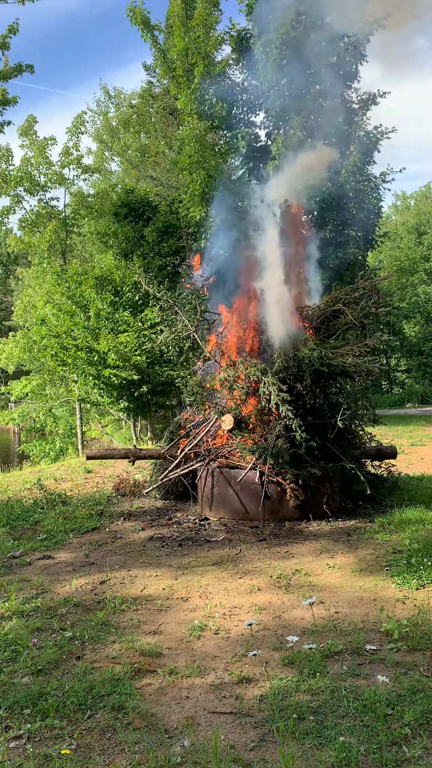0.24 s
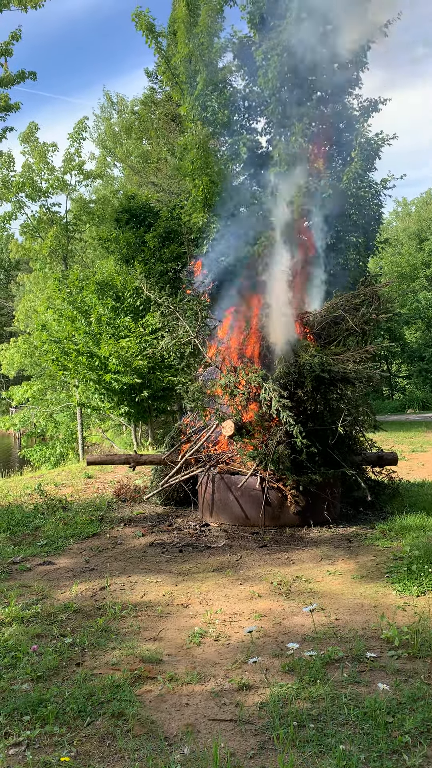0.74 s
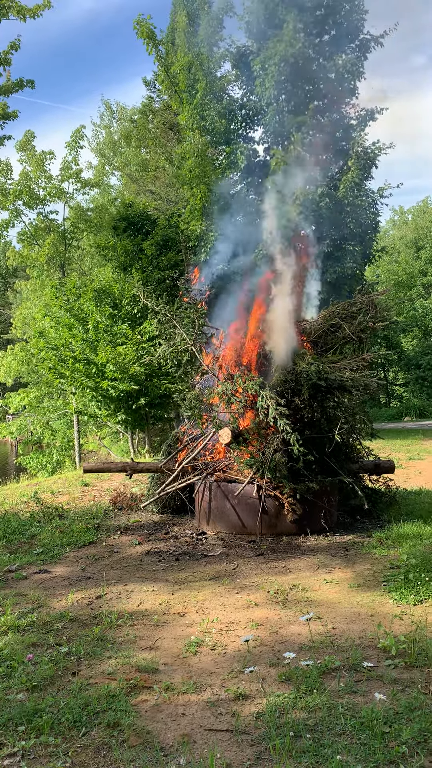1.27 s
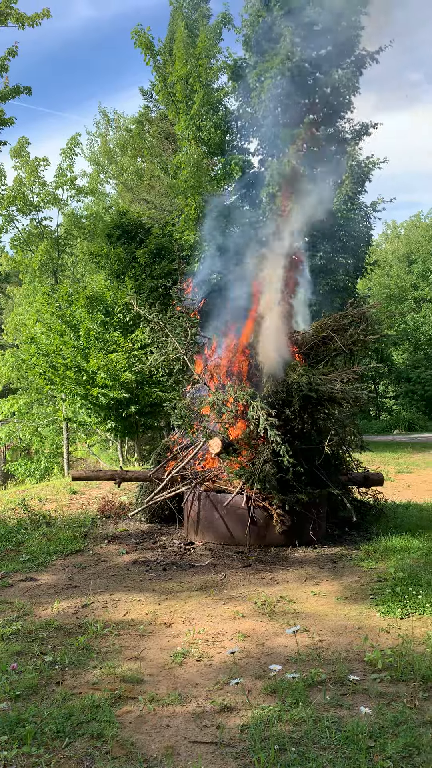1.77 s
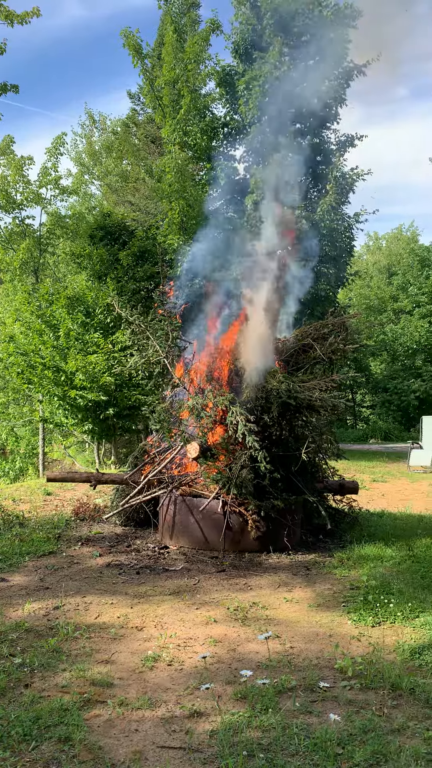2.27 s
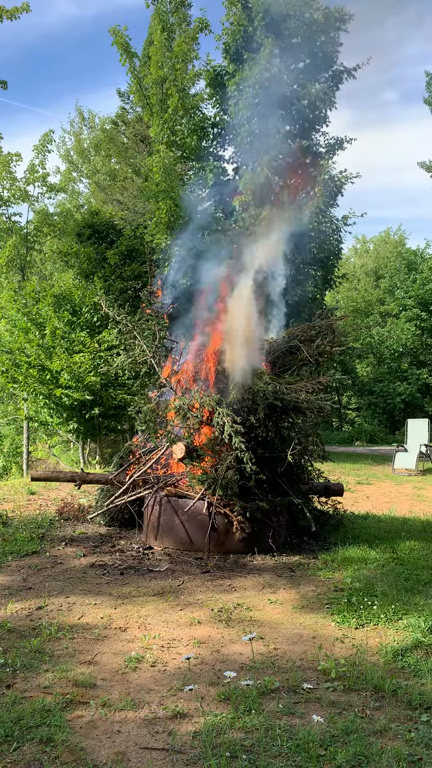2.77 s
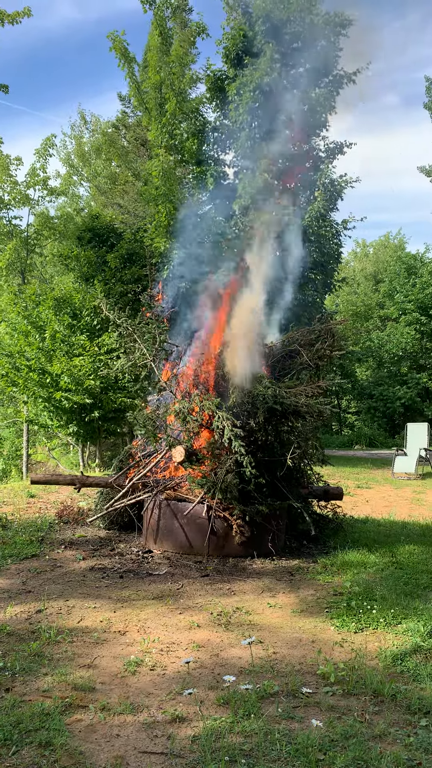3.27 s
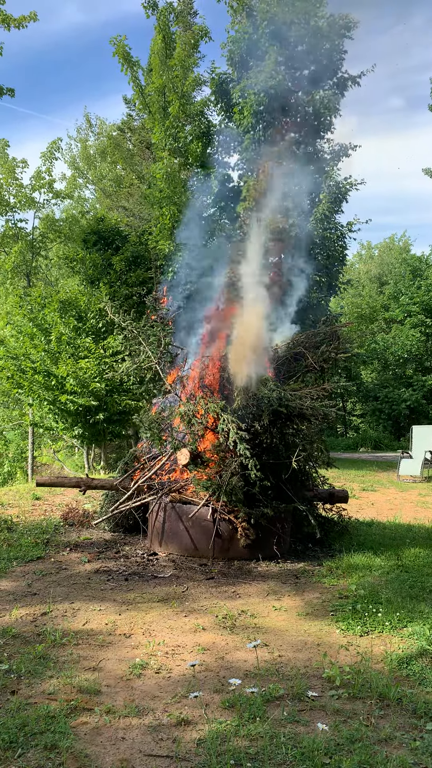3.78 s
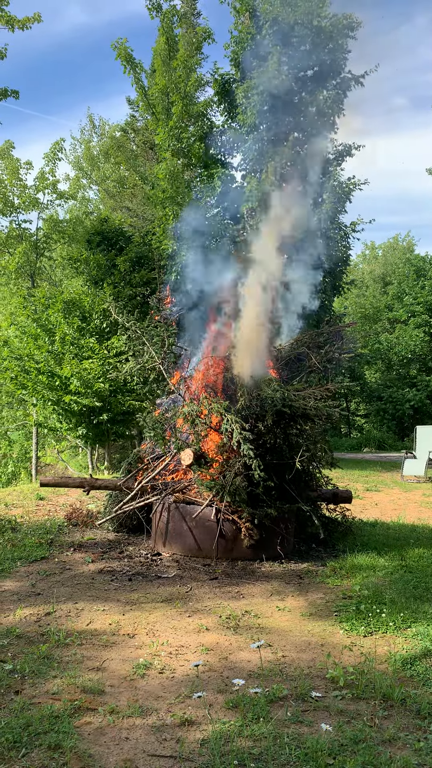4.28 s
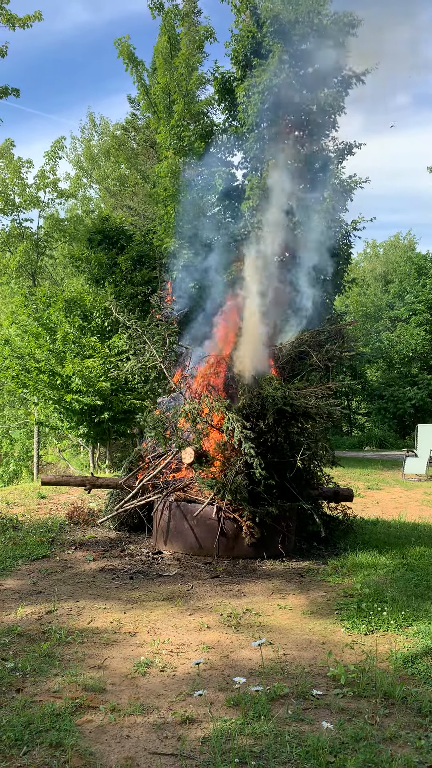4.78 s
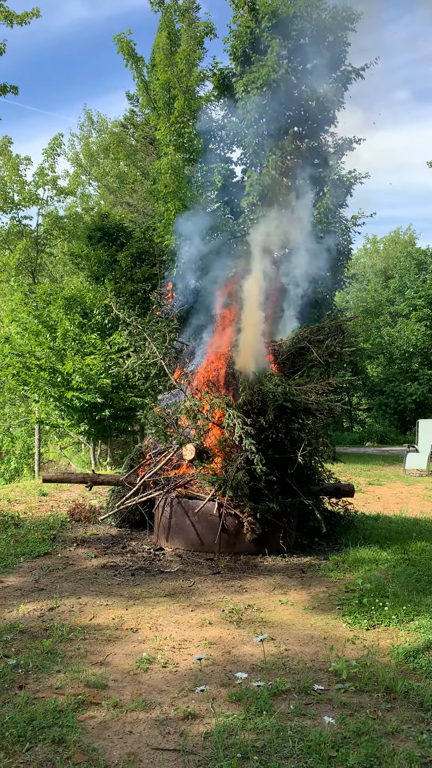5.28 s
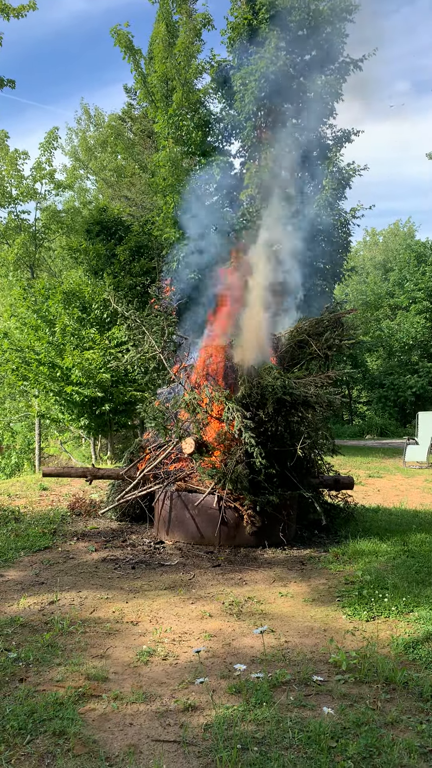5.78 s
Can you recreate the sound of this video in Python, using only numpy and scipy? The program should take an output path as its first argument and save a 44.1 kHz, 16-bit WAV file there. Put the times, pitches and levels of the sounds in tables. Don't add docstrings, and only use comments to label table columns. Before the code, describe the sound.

A large heap of green brush burns outdoors, heard from some ten metres away. A low, steady flame roar and soft rush stay faint underneath. Fine needle crackle runs throughout, with bright, dry twig snaps standing out, strongest in clusters between about one and four seconds. Thicker sticks give short hollow pops. A stereo microphone catches it in open air, with only a dull, immediate reflection from soft ground.

```python
import sys
import numpy as np
from scipy import signal
from scipy.fft import rfft, irfft, next_fast_len
from scipy.io import wavfile
from scipy.ndimage import uniform_filter1d, minimum_filter1d

SR = 44100
rng = np.random.default_rng(int(sys.argv[2]) if len(sys.argv) > 2 else 0)


def amplitude_ratio(level_db):
    exponent = np.asarray(level_db, float) / 20
    return 10 ** exponent


def materialize(psi):
    bounded = np.clip(np.atleast_2d(psi).T, -1, 1)
    quanta = np.round(bounded * 32767).astype(np.int16)
    wavfile.write(sys.argv[1], SR, quanta)


N = 265878

# time in seconds, level of the rush in dB.
FLAME_RUSH = [
    (0.0, -47),
    (3.81, -47.5),
    (4.16, -46),
    (5.04, -48),
    (6.03, -46),
]
# frequency in Hz, level in dB per Hz.
ROAR_TONE = [(20, -40), (32, -9), (55, -4), (85, -2), (160, -6.5), (250, -13.5), (330, -15), (500, -29.5),
             (800, -94)]
# frequency in Hz, level in dB per Hz.
RUSH_TONE = [(120, -58), (250, 12), (400, 9.5), (700, 6), (1400, 1.5), (2800, -7.5), (5000, -34),
             (10000, -4.5), (16000, -13.5)]
# time in seconds, level in dB.
CRACKLE = [(0.0, -36.5), (0.23, -40), (0.77, -41.5), (0.95, -38), (1.53, -40), (1.61, -40), (2.13, -37),
           (2.79, -38), (3.09, -38.5), (3.96, -39.5), (4.1, -38), (4.68, -38.5), (5.07, -40), (5.64, -38.5),
           (6.03, -37.5)]
# frequency in Hz, level in dB per Hz.
SNAP_TONE = [(250, -70), (600, -26), (1000, -16), (2000, -11), (4000, -7), (5000, -4), (7600, -3),
             (8300, 0), (10500, -2), (16500, -1)]
# time in seconds, peak
# level in dB.
MORE_TWIG_CRACKS = [(0.0845, -20), (0.2432, -13.5), (0.837, -7.5), (1.4267, -6), (1.6105, -9), (1.7108, -12),
                    (1.897, -19), (1.9969, -9), (2.1358, -14.5), (2.1739, -7.5), (2.2499, -4.5), (2.5705, -11),
                    (2.822, -10), (3.2795, -7), (3.6786, -12), (3.6842, -8), (3.7495, -10.5), (3.9057, -8.5),
                    (4.2967, -9.5), (4.3353, -10), (4.2377, -10), (4.5901, -11), (4.6244, -15.5), (4.6772, -11),
                    (4.8244, -11.5), (5.0393, -9), (5.1301, -9.5), (5.1533, -10), (5.824, -6), (5.9, -14)]
# time in seconds, peak level in dB, woody body in dB
TWIG_CRACKS = [(0.4627, -9, -19.5), (0.4716, -7, -19.5), (0.6929, -12, -25), (0.8304, -3, -27),
               (0.8517, -10, -22), (0.8619, -8.5, -15), (0.9739, -12, -12), (1.1002, -11, -15.5),
               (1.173, 0, -32), (1.1907, -13, -11), (1.3673, -2, -23), (1.5583, -7, -21),
               (1.5927, -7, -24.5), (1.6983, -7.5, -24), (2.0221, -6, -18), (2.2183, -6.5, -20.5),
               (2.3001, -2.5, -31), (2.3885, -12, -32), (2.7439, -9.5, -19), (2.9653, -3, -14.5),
               (2.9689, -6, -60), (3.6828, -7.5, -15), (3.7108, -9.5, -8), (3.9448, -6.5, -27),
               (3.9832, -4.5, -17), (4.0355, -7, -17), (5.4788, -9, -13.5), (5.5078, -4.5, -19.5),
               (5.5207, -9, -33), (5.7101, -1.5, -26)]
# time in seconds, peak level in dB, pitch in Hz.
STICK_POPS = [(0.2176, -30.5, 1660.0), (0.4713, -49, 1570), (0.9737, -35, 1100), (1.289, -25, 2220),
              (1.3912, -29, 1280), (1.4237, -27.5, 1180.0), (1.8169, -25.5, 1220), (2.0219, -27, 1160),
              (2.3229, -33, 1110), (2.8196, -26.5, 1700.0), (2.9639, -34, 2450), (3.0079, -31, 1180),
              (3.4045, -31, 1140.0), (3.5043, -31, 1170), (3.6825, -36, 1020), (3.7093, -15.5, 1180.0),
              (3.7108, -34, 770), (3.7322, -28, 1230.0), (3.9701, -29, 1770.0), (3.9827, -23, 2440),
              (4.1559, -29, 1170), (4.3128, -24.5, 1140), (5.3271, -32.5, 1210.0), (5.4352, -31.5, 1120),
              (5.4784, -39, 1280), (5.5073, -32, 710.0), (5.7028, -28, 1680.0)]
# lag of the ground echo in seconds, lag between the ports in seconds.
HEAP_PARTS = [
    (.00177, .000227),
    (.001795, .000231),
    (.00182, .000235),
]
# frequency in Hz, level in dB.
SCATTERED = [(60, -41), (125, -33), (250, -16.5), (1000, -10), (1600, -15.5), (2600, -16.5), (4000, -8.5),
             (6000, -11), (16000, -21)]
# frequency in Hz, gain
# in dB.
MIX_TONE = [(20, -30), (35, -8), (50, 0), (15800, 0), (15900, -22), (20000, -26)]

PADDED = next_fast_len(N + 4096)
GRID_HZ = np.fft.rfftfreq(PADDED, 1 / SR)


def rms_one(x):
    return x / np.sqrt(np.mean(x ** 2) + 1e-20)


def in_time(rows):
    s, level = np.transpose(rows)
    return np.interp(np.arange(N) / SR, s, level)


def response(points):
    hz, db = np.transpose(points)
    return amplitude_ratio(np.interp(np.log(GRID_HZ + 1), np.log(hz), db))


def colour(x, points):
    return irfft(rfft(x, PADDED) * response(points), PADDED)[..., :N]


def band(x, low_hz, high_hz):
    edges_hz = [low_hz, min(high_hz, .45 * SR)]
    return signal.sosfilt(signal.butter(2, edges_hz, "band", fs=SR, output="sos"), x)


def drift(rate_hz):
    r = np.exp(-2 * np.pi * rate_hz / SR)
    wander = signal.lfilter([1], [1, -2 * r, r * r], rng.standard_normal(N + SR))
    return rms_one(wander[SR:])


def flames():
    roar_db = -45 + 0.39 * drift(0.96)
    rush_db = in_time(FLAME_RUSH) + 1.28 * drift(14.4)
    roar = rms_one(colour(rng.standard_normal(N), ROAR_TONE))
    rush = rms_one(colour(rng.standard_normal(N), RUSH_TONE))
    return amplitude_ratio(roar_db) * roar + amplitude_ratio(rush_db) * rush


def hush():
    clear_s = 0.016
    out = np.ones(N)
    for s, *_ in TWIG_CRACKS + MORE_TWIG_CRACKS:
        out[max(int((s - clear_s) * SR), 0):int(s * SR)] = 0
    return out


def fade(x, decay_s):
    return signal.lfilter([1], [1, -np.exp(-1 / (decay_s * SR))], x + 1e-18)


def burst(marks, snap_s, snap_db, spit_s, spit_db):
    edge = marks * rng.choice([-1, 1], N)
    ragged = amplitude_ratio(snap_db) * fade(marks, snap_s) * rng.standard_normal(N)
    swell = fade(marks[:, ::-1], spit_s * .7)[:, ::-1] * .2
    spit = amplitude_ratio(spit_db) * (swell + fade(marks, spit_s)) * rng.standard_normal(N)
    return edge + ragged + spit


def needles(crackle_db):
    per_s = 1500 * amplitude_ratio(4.0 * drift(40)) * (.55 + .45 * hush())
    born = rng.random((len(HEAP_PARTS), N)) < per_s / SR
    sizes = amplitude_ratio(6.0 * np.minimum(rng.exponential(1, N), 3.3))
    snaps = burst(born * sizes, snap_s=0.00022, snap_db=-11.5, spit_s=0.0005, spit_db=-17)
    return amplitude_ratio(crackle_db - 1.0) * rms_one(colour(snaps, SNAP_TONE))


def ticks(crackle_db):
    swell_db = 1.2 * (crackle_db - crackle_db.mean())
    per_s = 55 * amplitude_ratio(swell_db + 3.0 * drift(25)) * hush()
    size_db = np.minimum(-21 + 4 * rng.exponential(1, N), -9.5)
    part = rng.integers(0, len(HEAP_PARTS), N) == np.arange(len(HEAP_PARTS))[:, None]
    return part * (rng.random(N) < per_s / SR) * amplitude_ratio(size_db)


def spikes(times, level_db):
    out = np.zeros((len(HEAP_PARTS), N))
    part = (rng.random(len(times)) * len(HEAP_PARTS)).astype(int)
    out[part, np.round(times * SR).astype(int)] = amplitude_ratio(level_db)
    return out


def twigs(crackle_db):
    s, peak_db, body_db = np.transpose(TWIG_CRACKS)
    lighter = spikes(*np.transpose(MORE_TWIG_CRACKS)) + ticks(crackle_db)
    snap_marks = amplitude_ratio(10.0) * (spikes(s, peak_db) + lighter)
    lighter_body_db = -21.5 - 0.5 * rng.standard_normal(N)
    body_marks = amplitude_ratio(15.5) * (spikes(s, peak_db + body_db) + lighter * amplitude_ratio(lighter_body_db))
    bright = burst(snap_marks, snap_s=0.00012, snap_db=-16, spit_s=0.001, spit_db=-17)
    body = burst(body_marks, snap_s=0.00014, snap_db=-20.5, spit_s=0.0036, spit_db=-15.5)
    return band(colour(bright, SNAP_TONE), 4440, 24000) + band(body, 750, 6700)


def sticks():
    out, t = np.zeros(N), np.arange(600) / SR
    for s, peak_db, hz in STICK_POPS:
        i = round(s * SR)
        dying = np.exp(-t * hz / 0.95)
        ringing = amplitude_ratio(peak_db + 4.5) * np.sin(2 * np.pi * hz * t) * dying
        out[i:i + len(t)] += ringing[:N - i]
    return band(out, 710, 4400)


def ground(lag_s):
    echo_db, cut_hz, turn = -6, 1300, .9
    late = np.exp(1j * (turn - 2 * np.pi * GRID_HZ * lag_s))
    return 1 + amplitude_ratio(echo_db) * late / np.sqrt(1 + (GRID_HZ / cut_hz) ** 2)


def ports(lag_s):
    split_hz, zero_hz, least_turn = 2100, 2450, 1.5
    turn = np.maximum(2 * np.pi * (GRID_HZ - zero_hz) * lag_s, least_turn) * (GRID_HZ > split_hz)
    wander = uniform_filter1d(rng.standard_normal(len(GRID_HZ)), size=900) * 60
    own = response(SCATTERED) * np.exp(2j * np.pi * wander)
    return np.array([1 + own, (1 - own) * np.exp(-1j * turn)])


def thin_treble(x, under_db, waver_db, calm):
    shift, width = 272, 16
    window, frame = ("tukey", .3), dict(nperseg=1280, noverlap=256, nfft=2048)
    pair = np.pad([x[0] + x[1], x[0] - x[1]], ((0, 0), (shift, 0)))
    hz, s, cells = signal.stft(pair, SR, window, **frame)
    power = (abs(cells[:, :1024]) ** 2).reshape(2, -1, width, len(s)).sum(axis=2) + 1e-20
    held = -minimum_filter1d(-abs(pair[1]), size=1400)
    peaks = held[np.minimum((s * SR).astype(int), N - 1)] + 1e-9
    sharp_db = 20 * np.log10(peaks / np.median(peaks))
    band_hz = hz[:1024:width, None]
    limit_db = under_db + waver_db * rng.standard_normal(len(s)) - calm * sharp_db - 10 * (band_hz > 5100)
    weak = (power < amplitude_ratio(2 * limit_db) * power[::-1]) & (band_hz > 4000)
    cells[:, :1024] *= ~np.repeat(weak, width, axis=1)
    mid, side = signal.istft(cells, SR, window, **frame)[1][:, shift:shift + N]
    return np.array([mid + side, mid - side]) / 2


def scene():
    crackle_db = in_time(CRACKLE)
    parts = needles(crackle_db) + twigs(crackle_db)
    parts[1] += flames() + sticks()
    heard = 0
    for part, (echo_s, lag_s) in zip(parts, HEAP_PARTS):
        heard = heard + rfft(part, PADDED) * ground(echo_s) * ports(lag_s)
    return irfft(heard, PADDED)[:, :N]


def band_limit(x):
    return signal.sosfilt(signal.butter(12, 15850, fs=SR, output="sos"), x)


def record(dry):
    rounded = 1.232 * np.tanh(colour(dry, MIX_TONE) / 1.429)
    mix = thin_treble(rounded, under_db=-5.0, waver_db=3.5, calm=1.2)
    return band_limit(mix)


dry = scene()
out = record(dry)
materialize(out)
```